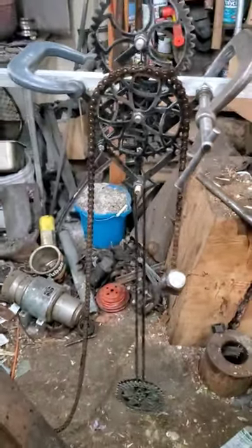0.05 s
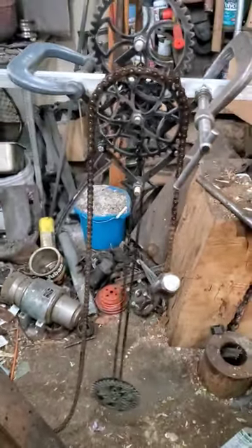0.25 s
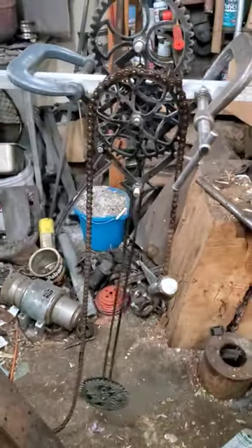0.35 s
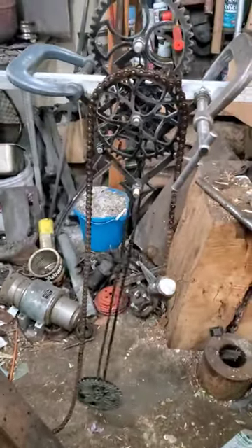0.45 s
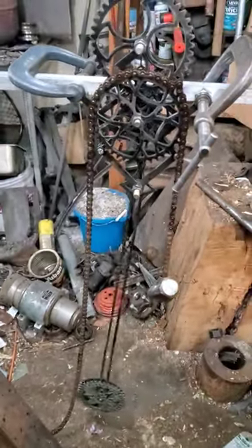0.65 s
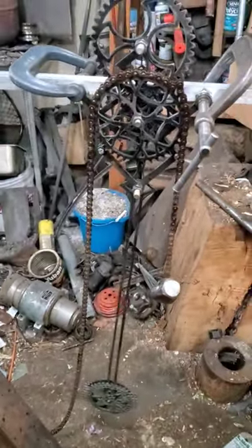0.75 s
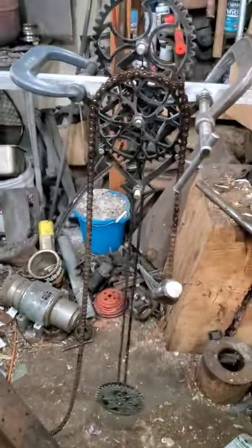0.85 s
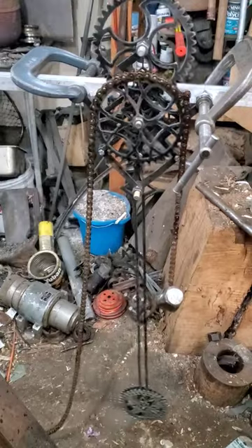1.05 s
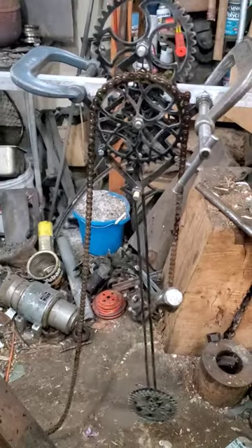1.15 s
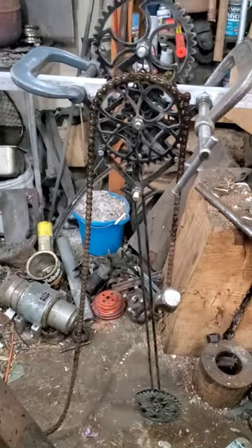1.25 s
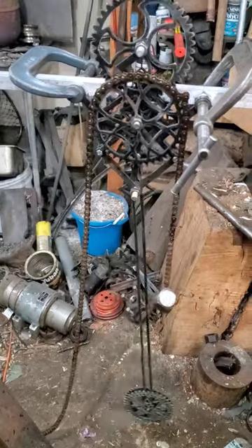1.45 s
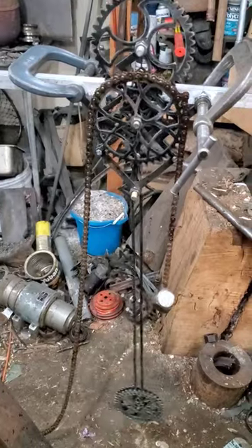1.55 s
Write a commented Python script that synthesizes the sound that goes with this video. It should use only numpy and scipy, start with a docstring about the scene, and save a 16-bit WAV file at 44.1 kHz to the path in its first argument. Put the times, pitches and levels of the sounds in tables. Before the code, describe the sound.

A homemade pendulum clock ticks with sharp metallic clashes and light chain clinks.

```python
"""A pendulum clock of bicycle sprockets and chain ticks close on the right in a quiet workshop.
Chain links clink over a soft rumble, and the escape wheel catches, then drops onto the first steel pallet:
the impact clashes, chatters and knocks the frame, and the wheel rings on in its free modes.
One high partial sings, more links settle and a pivot squeaks faintly. A tooth then slides along a pallet,
the wheel drops onto the second pallet and recoils, and a last link clinks."""
import sys
import numpy as np
from scipy import signal
from scipy.fft import rfft, irfft, next_fast_len
from scipy.io import wavfile
from scipy.ndimage import map_coordinates

SR = 44100
rng = np.random.default_rng(int(sys.argv[2]) if len(sys.argv) > 2 else 0)


def transcribe(signal):
    """Save signal, clipped to [-1, 1], as a 16-bit WAV file at the path in sys.argv[1]."""
    frames = np.atleast_2d(signal).T
    limited = np.clip(frames, -1, 1)
    pcm = np.round(limited * 32767).astype(np.int16)
    wavfile.write(sys.argv[1], SR, pcm)


N = 70560
T = np.arange(N) / SR

# Levels in a spectrum or a set of modes are relative: each is normalised before use.
# Background rumble: frequency_hz, density_db
BACKGROUND_SPECTRUM = [(20, -14.5), (40, -9.5), (62, 2.5), (90, -5.5), (130, -13.5), (300, -20.5),
                       (550, -28.5), (900, -32), (2000, -32.5), (5000, -40), (12000, -48)]
# Likeness of the room sound at the two ears: frequency_hz, coherence
COHERENCE = [(60, .98), (150, 0.95), (400, 0.71), (1000, 0.12), (4000, 0.085)]
# Loudness of the rolling chain: time_s, level_db
ROLL_ENVELOPE = [(0, -67), (.35, -65), (.6, -60.5), (0.759, -66.5), (1.02, -74.5), (1.14, -58),
                 (1.33, -59.5), (1.45, -60.5), (1.6, -70.5)]
# Rolling chain: frequency_hz, density_db
ROLL_SPECTRUM = [(100, -33), (250, -3.5), (400, -2.5), (560, -7.5), (800, -22), (1600, -19), (3000, -24),
                 (8000, -50)]
# Links settling: start_s, wheel_db, link_db, click_db, knock_db, wheel_tilt_db_per_octave, loaded_pallet
CLINKS = [(.001, -51.5, -61, -77, -61, 0.5, 0), (0.046, -56, -61, -49.5, -63, -8, 0),
          (0.098, -53, -56, -54, -62.5, -5, 0), (0.151, -63, -72, -78, -65.5, -2, 0),
          (0.3, -41, -37, -38.5, -62, 3, 0), (0.382, -58, -47, -46, -49.5, 15, 0),
          (0.573, -49, -56, -55, -77, -3, 0), (.608, -60, -42.5, -52, -59, 21, 0),
          (.775, -58, -65, -61, -67, -1, 0), (0.983, -58, -60.5, -66, -78, 1, 0),
          (1.08, -74, -63, -61, -62.5, 24, 1), (1.554, -51, -62, -43, -66, -7, 1)]
# Long ring of the wheel: pitch_hz, t60_s, first_pallet_db, second_pallet_db
WHEEL_MODES = [(4835, 0.45, -12, -7.5), (6490, 0.64, -15.5, -8.5), (6943, 0.64, -7, -11),
               (7033, 0.7, -4.5, -10.5), (7580, 0.92, -11.5, -0.5), (8700, 0.38, -39, -10),
               (9402, 0.9, -9, -13), (10050, 0.44, -11, 1.5), (10280, 0.26, -1, -1), (11700, 0.56, -14, -7),
               (12000, 0.75, -17, -24), (11890, 0.37, -5, -6), (12900, 0.67, -4.5, -2.5),
               (15000, 0.4, -16, -8)]
# Ring of a link: pitch_hz, level_db
LINK_MODES = [(4834, -63), (6950, -73), (7052, -58), (7580, -102), (8134, -60.5), (9555, -83),
              (10287, -104), (11122, -66), (12037, -42.5), (12947, -58), (14944, -77), (15364, -70)]
# Steel against steel: frequency_hz, density_db
CLASH_SPECTRUM = [(500, -27.5), (2000, -24), (5000, -19.5), (7200, -10.5), (8500, -13.5), (10500, -8.5),
                  (12300, -1), (14000, -9), (15300, -10.5)]
# Light touch on the frame: frequency_hz, density_db
TAP_SPECTRUM = [(200, -6), (550, 1), (900, -7), (1700, -1), (2600, -6), (8000, -9), (15000, -17)]
# Frame modes that a light touch excites: pitch_hz, level_db
TAP_MODES = [(1545, 0.5), (1810, 3.5)]
# Reverberation time: frequency_hz, t60_s
ROOM_DECAY = [(300, .45), (2000, 0.65), (8000, 0.47), (14000, 0.16)]
# Reverberation gain: left_db, right_db
ROOM_DB = [-23, -15]
# Escapement impacts: start_s, knock_db, clash_db, clash_t60_s, ring_db, wheel_db, contact
# (contact 0 is the first pallet, 1 the second, 2 the catch before a drop, 3 the recoil after one)
BLOWS = [(0.189, -54.5, -32.5, 0.076, -47, -72, 2), (.198, -43.5, -20.5, 0.065, -43, -63, 2),
         (0.2019, -56, -29, 0.04, -25.5, -48, 2), (.413, -33, -18.5, 0.18, -18, -39, 0),
         (0.419, -38, -18.5, 0.066, -17.5, -39, 0), (0.428, -56, -37, 0.049, -29, -45, 0),
         (.458, -43.5, -10, 0.055, -50, -66, 0), (0.4634, -60, -29, 0.039, -38, -63, 0),
         (1.184, -33, -19.5, 0.17, -22, -41.5, 1), (1.19, -42, -19.5, 0.099, -11, -40.5, 1),
         (1.22, -39, -45, 0.1, -59, -72, 1), (1.2256, -53.5, -10.5, 0.02, -27, -44, 1),
         (1.392, -46.5, -39, 0.38, -45, -51.5, 3)]
# Short, hard ring of the steel, one list per contact: pitch_hz, level_db
STEEL_MODES = [
    [(6460, -65), (7133, -39.5), (8640, -55), (9399, -41.5), (10018, -45), (11138, -34.5), (11703, -59),
     (12016, -30), (12532, -34), (12877, -36), (13135, -36), (14928, -38)],
    [(6132, -71), (7580, -60), (10901, -38.5), (11639, -50), (11843, -40), (12010, -39.5), (12635, -43),
     (12877, -40), (13873, -38), (14072, -43), (14567, -48), (15359, -42)],
    [(7278, -59), (7903, -69), (11106, -59), (11994, -41), (12855, -58), (13878, -44), (14669, -54),
     (14820, -56), (15299, -50)],
    [(5512, -63), (6961, -60), (7574, -57), (8646, -74), (9399, -54), (10083, -73), (11127, -68),
     (11983, -62), (12527, -69), (12882, -57), (14013, -73), (14928, -74)],
]
# Frame modes, one list per contact: pitch_hz, level_db
FRAME_MODES = [
    [(160, -2.5), (334, 0), (1320, -3.5), (1560, 1.5), (1825, 0.5), (2223, -3.5), (2702, -3), (3117, -28),
     (3920, 3), (4300, -0.5), (4893, 2.5), (5350, -8)],
    [(440, -6.5), (546, -7), (1020, -6), (1380, -3), (1550, 2.5), (1798, -1.5), (2230, -6.5), (2640, -11),
     (3950, -10), (4540, -3.5)],
    [(305, -9.5), (680, -11.5), (920, -6.5), (1287, -2), (1520, -4.5), (1798, -1.5), (2060, -6.5),
     (3380, -9), (3950, -12)],
    [(300, -1.5), (1400, -8.5), (2300, -9.5), (3090, -1), (3900, -6.5), (4900, -3.5)],
]
# Sharp knock of the frame: frequency_hz, density_db
KNOCK_SPECTRUM = [(100, -60), (300, -9), (700, -5), (1100, -2.5), (1700, 5), (3000, -3), (6000, 1),
                  (9000, 0), (15000, -45)]
# Dull thud of the frame: frequency_hz, density_db
THUD_SPECTRUM = [(60, -11), (150, -4), (350, -2), (550, 0), (800, -14), (2000, -17)]
# Loudness of the sliding tooth: time_s, level_db
SLIDE_ENVELOPE = [(1.051, -99), (1.074, -53), (1.11, -61), (1.14, -55.5), (1.169, -49.5), (1.186, -50)]

STEEL_RISE_S, STEEL_T60_S = 0.002, [0.14, 0.098, 0.14, 0.4]  # one decay time per contact
KNOCK_RISE_S, KNOCK_T60_S, FRAME_T60_S = 0.0018, 0.22, 0.19
CLASH_LEFT_DB, RING_LEFT_DB = -14, -21  # left ear relative to right


def amp(db):
    return 10 ** (np.asarray(db) / 20)


def unit_rms(x):
    return x / np.sqrt(np.mean(x ** 2) + 1e-20)


def along(points, hz):
    """Interpolation of (frequency_hz, value) points on a logarithmic frequency axis."""
    frequencies, values = np.transpose(points)
    return np.interp(np.log(hz + 1), np.log(frequencies + 1), values)


def filtered(x, response):
    """Linear filtering multiplies the spectrum by a frequency response."""
    size = next_fast_len(N + 8192)
    return irfft(rfft(x, size) * response(np.fft.rfftfreq(size, 1 / SR)), size)[..., :N]


def noise(spectrum):
    """Two incoherent channels of spectrally shaped noise, rms 1."""
    return unit_rms(filtered(rng.standard_normal((2, N)), lambda hz: amp(along(spectrum, hz))))


def wobble(knots_per_s):
    """Random modulation, linear between Gaussian knots."""
    return map_coordinates(rng.standard_normal(N), [T * knots_per_s], order=1)


def struck(start_s, rise_s, t60_s):
    """A damped vibration builds quickly, then decays exponentially, 60 dB in t60_s."""
    t = np.maximum(T - start_s, 0)
    return (1 - np.exp(-t / rise_s)) * amp(-60 * t / t60_s)


def ring(modes, start_s, rise_s, t60_s, drift_rad):
    """Free vibration is a sum of damped modes; each wanders in level and phase, with a phase per ear."""
    drift_per_s, shimmer_per_s, shimmer_db = 95.7, 45, 2.5
    hz, db = np.transpose(modes)
    gains = amp(db + rng.normal(0, 1, len(db)))
    out = np.zeros((2, N))
    for pitch_hz, gain, life_s in zip(hz, gains / np.linalg.norm(gains), t60_s * np.ones(len(hz))):
        span = slice(int(start_s * SR) + 1, int((start_s + life_s) * SR))
        t = T[span] - start_s
        drift = np.interp(t * drift_per_s, np.arange(256), rng.standard_normal(256))
        phase = 2 * np.pi * (pitch_hz * t + rng.random((2, 1))) + drift_rad * drift
        shimmer = np.interp(t * shimmer_per_s, np.arange(256), rng.standard_normal(256))
        envelope = (1 - np.exp(-t / rise_s)) * amp(-60 * t / life_s)
        out[:, span] += gain * amp(shimmer_db * shimmer) * envelope * np.sin(phase)
    return np.sqrt(2) * out


def on_right(x, left_db):
    """An interaural level difference places the source on the right."""
    return x * np.array([[amp(left_db)], [1]])


def diffuse(pair):
    """A diffuse field is coherent between the ears in the bass and nearly incoherent in the treble."""
    def mid_side_gains(hz):
        angle = np.arccos(np.clip(along(COHERENCE, hz), -1, 1)) / 2
        return np.array([np.cos(angle), np.sin(angle)])
    mid, side = filtered(pair, mid_side_gains)
    return np.array([mid + side, mid - side])


def background():
    """Stationary noise: a diffuse low rumble and a faint white hiss."""
    return amp(-55.5) * diffuse(noise(BACKGROUND_SPECTRUM)) + amp(-84.5) * rng.standard_normal((2, N))


def chain_roll():
    """Rolling noise swells and fades softly, as of chain on the turning wheel."""
    time_s, level_db = np.transpose(ROLL_ENVELOPE)
    return amp(np.interp(T, time_s, level_db)) * diffuse(noise(ROLL_SPECTRUM))


def wheel_ring(start_s, pallet, tilt_db_per_octave=0):
    """The sprocket rings in its natural modes; the pallet that holds it sets their balance."""
    hz, t60_s, *pallet_db = np.transpose(WHEEL_MODES)
    scatter_db = 2 * rng.standard_normal(len(hz))
    db = pallet_db[round(pallet)] + tilt_db_per_octave * np.log2(hz / hz[0]) + scatter_db
    tone = ring(np.c_[hz, db], start_s, rise_s=0.0015, t60_s=t60_s, drift_rad=0.42)
    return on_right(tone, RING_LEFT_DB)


def link_click(start_s, half_width_hz=82, valley_db=2):
    """Resonant filtering: a link's own modes colour the noise of its brief rattle."""
    def resonances(hz):
        peaks = sum(1 / (1 + ((hz - pitch_hz) / half_width_hz) ** 2) for pitch_hz, _ in LINK_MODES)
        return peaks + amp(valley_db)
    rattle = unit_rms(filtered(noise(CLASH_SPECTRUM), resonances))
    return on_right(rattle * struck(start_s, STEEL_RISE_S, t60_s=0.14), CLASH_LEFT_DB)


def chain_clinks():
    """Each settling link is a light impact that excites three coupled bodies: link, wheel and frame."""
    out = np.zeros((2, N))
    tap = diffuse(noise(TAP_SPECTRUM))
    for start_s, wheel_db, link_db, click_db, knock_db, tilt, pallet in CLINKS:
        link = ring(LINK_MODES, start_s, STEEL_RISE_S, t60_s=0.19, drift_rad=0.3)
        out += amp(link_db) * on_right(link, RING_LEFT_DB)
        out += amp(wheel_db) * wheel_ring(start_s, pallet, tilt)
        out += amp(click_db) * link_click(start_s)
        frame = amp(-3.5) * ring(TAP_MODES, start_s, KNOCK_RISE_S, FRAME_T60_S, drift_rad=0.61)
        out += amp(knock_db) * (tap * struck(start_s, KNOCK_RISE_S, KNOCK_T60_S) + frame)
    return out


def workshop_reverb(x):
    """Reverberation is convolution with the room's short, diffuse tail, whose decay varies with frequency."""
    hz, t, spectra = signal.stft(rng.standard_normal((2, SR // 2)), SR, nperseg=256)
    decay = amp(-60 * t / along(ROOM_DECAY, hz)[:, None])
    _, tail = signal.istft(spectra * decay, SR, nperseg=256)
    tail /= np.linalg.norm(tail[0])
    return amp(ROOM_DB)[:, None] * signal.fftconvolve(x[None], tail, axes=1)[:, :N]


def metal_noise(spectrum, ripple_db=7, spacing_hz=90):
    """Modal overlap: the metalwork's crowded resonances impose an uneven ripple on a noise spectrum."""
    knots = rng.standard_normal(1024)
    def ripple(hz):
        return amp(ripple_db * np.tanh(np.interp(hz / spacing_hz, np.arange(len(knots)), knots)))
    return unit_rms(filtered(noise(spectrum), ripple))


def clash(start_s, t60_s, chatter_db=2):
    """Steel chattering on steel modulates a broadband burst into dense grains."""
    grain = unit_rms(amp(chatter_db * wobble(900)))
    envelope = struck(start_s, rise_s=0.0024, t60_s=t60_s)
    return on_right(metal_noise(CLASH_SPECTRUM) * grain * envelope, CLASH_LEFT_DB)


def escapement():
    """Impact excitation: each blow gives a clash, a short ring of steel and a long ring of the wheel."""
    out = np.zeros((2, N))
    for start_s, _, clash_db, clash_t60_s, ring_db, wheel_db, contact in BLOWS:
        contact = round(contact)
        tone = ring(STEEL_MODES[contact], start_s, STEEL_RISE_S, STEEL_T60_S[contact], drift_rad=0.72)
        out += amp(ring_db) * on_right(tone, RING_LEFT_DB)
        out += amp(clash_db) * clash(start_s, clash_t60_s)
        out += amp(wheel_db) * wheel_ring(start_s, pallet=min(contact, 1))
    return out


def frame_knocks():
    """Structure-borne sound: the frame radiates each blow round the room as a knock over a longer thud."""
    out = np.zeros((2, N))
    for start_s, knock_db, *_, contact in BLOWS:
        knock = metal_noise(KNOCK_SPECTRUM) * struck(start_s, KNOCK_RISE_S, KNOCK_T60_S)
        modes = ring(FRAME_MODES[round(contact)], start_s, KNOCK_RISE_S, FRAME_T60_S, drift_rad=1.0)
        thud = noise(THUD_SPECTRUM) * struck(start_s, rise_s=0.0066, t60_s=0.49)
        out += amp(knock_db) * (knock + amp(-1.5) * modes + amp(-9) * thud)
    return diffuse(out)


def singing_partial(start_s=0.5, pitch_hz=13100, rise_s=0.18):
    """Two-stage decay: one partial swells after the first drop, then fades to a faint after-ring."""
    swell = ring([(pitch_hz, 0)], start_s, rise_s, t60_s=0.5, drift_rad=0.15)
    after_ring = ring([(pitch_hz, 0)], start_s, rise_s, t60_s=2, drift_rad=0.4)
    return amp(-30) * on_right(swell + amp(-22) * after_ring, left_db=-40)


def pivot_squeak(start_s=0.865, rise_s=0.013, pitch_hz=1660, sag_hz_per_s=700):
    """Dry friction in a pivot gives one faint, sagging chirp with a weak second harmonic."""
    t = np.maximum(T - start_s, 0)
    hz = pitch_hz - sag_hz_per_s * t + 30 * wobble(300)
    phase = 2 * np.pi * np.cumsum(hz) / SR
    envelope = t / rise_s * np.exp(1 - t / rise_s)
    return amp(-58) * envelope * (np.sin(phase) + amp(-16) * np.sin(2 * phase))


def tooth_slide():
    """Sliding friction: a tooth scrapes along the pallet before it drops, and a frame mode hums along."""
    time_s, level_db = np.transpose(SLIDE_ENVELOPE)
    envelope = amp(np.interp(T, time_s, level_db, left=-120, right=-120) + 3.3 * wobble(300))
    hum = np.sin(2 * np.pi * TAP_MODES[0][0] * T + 1.4 * wobble(160))
    scrape = on_right(noise(CLASH_SPECTRUM), left_db=-17)
    return envelope * (scrape + amp(-12.5) * noise(TAP_SPECTRUM) + amp(-13) * hum)


def scene():
    """Superposition of the clock, the reverberation of its steel and the background."""
    steel = escapement() + singing_partial() + chain_clinks()
    diffuse_sound = frame_knocks() + background() + workshop_reverb(steel[1])
    return steel + diffuse_sound + tooth_slide() + chain_roll() + pivot_squeak()


def record(dry, cutoff_hz=15500):
    """A steep low-pass filter limits the bandwidth."""
    return filtered(dry, lambda hz: 1 / (1 + (hz / cutoff_hz) ** 200))


dry = scene()
out = record(dry)
transcribe(out)
```